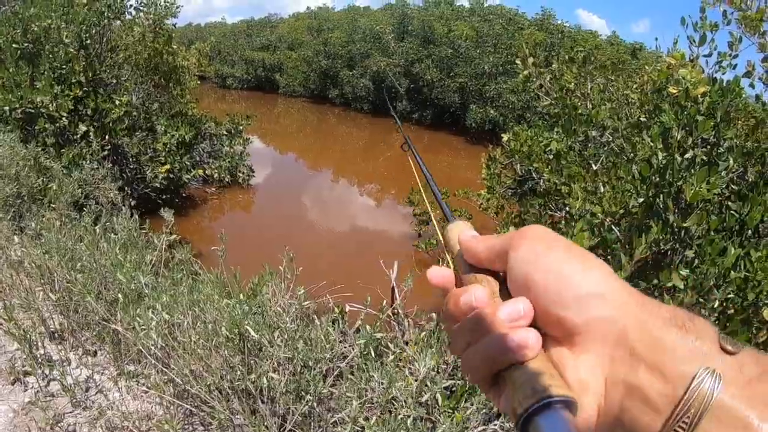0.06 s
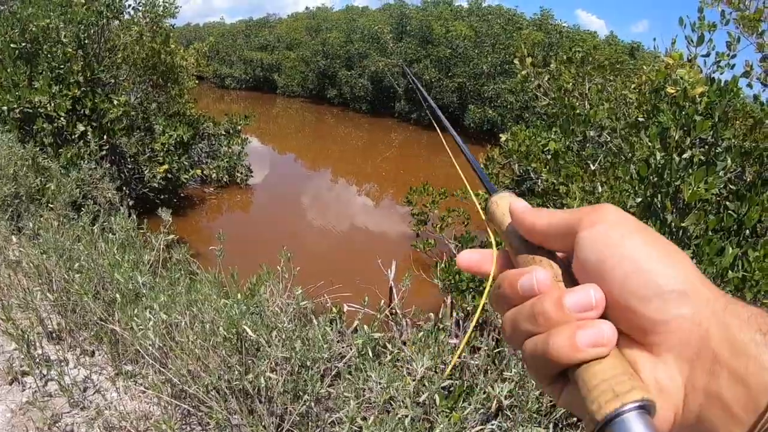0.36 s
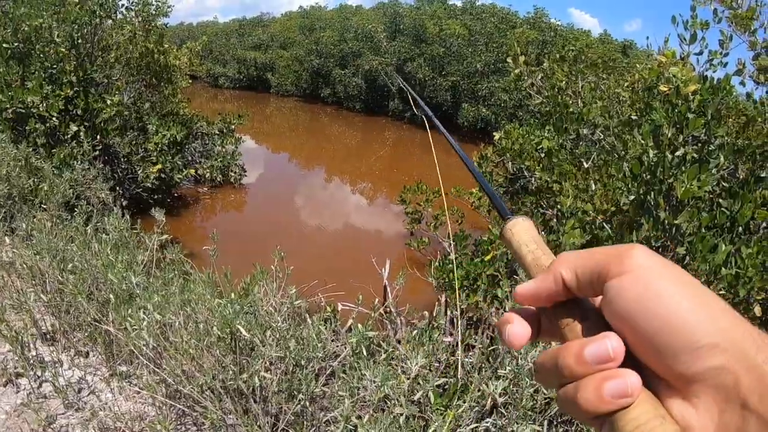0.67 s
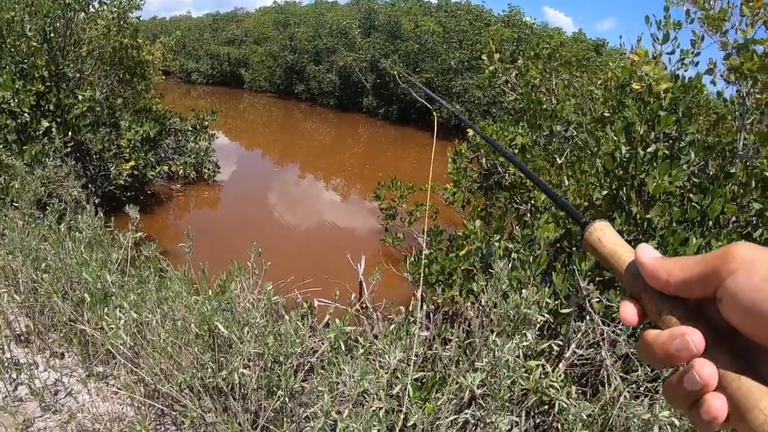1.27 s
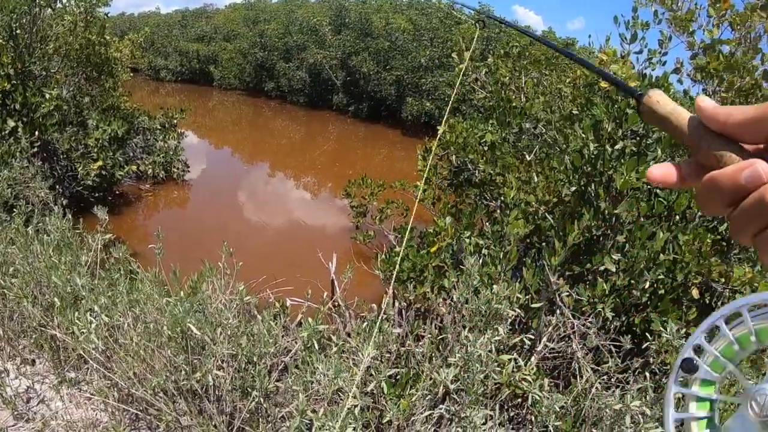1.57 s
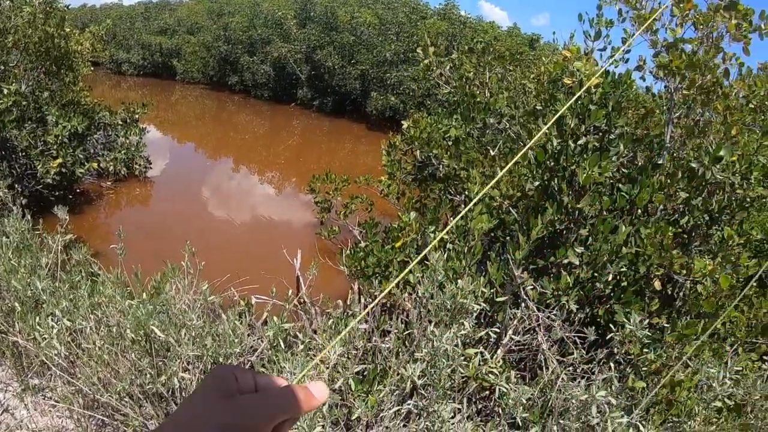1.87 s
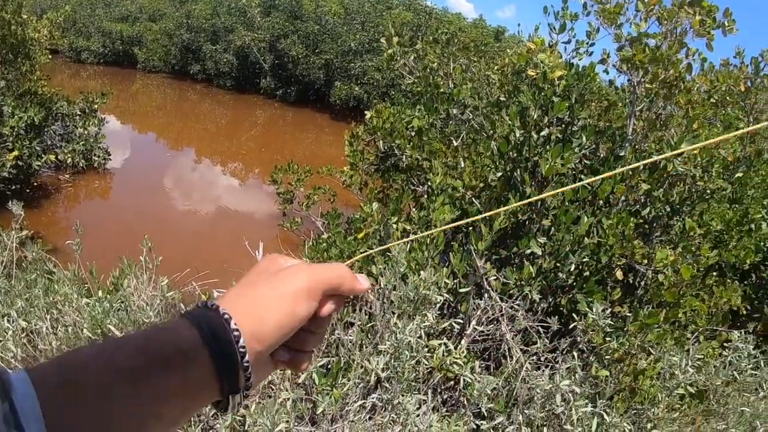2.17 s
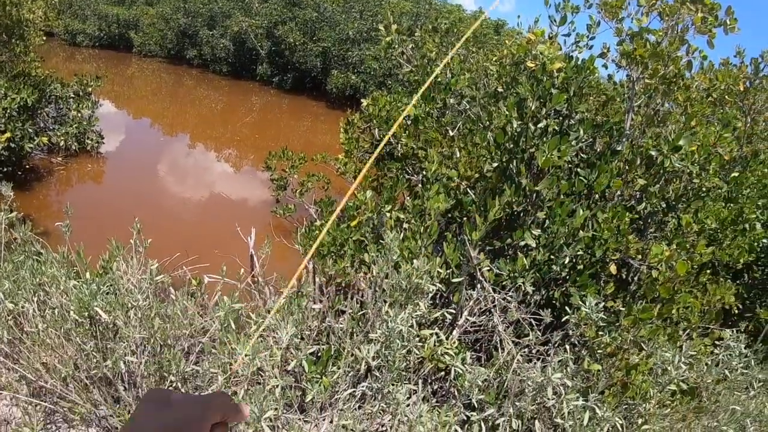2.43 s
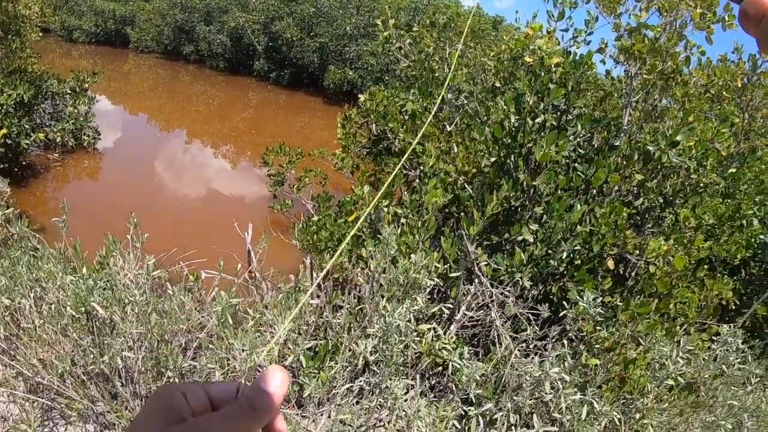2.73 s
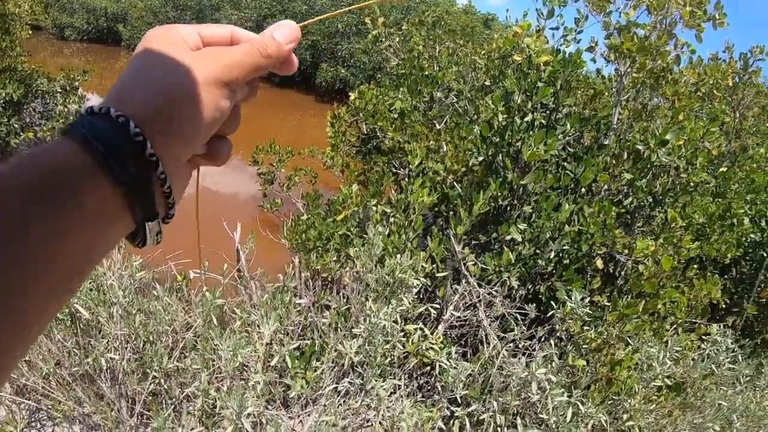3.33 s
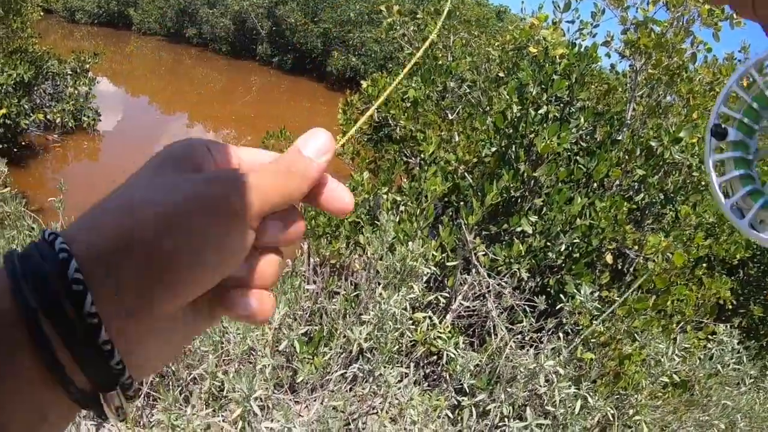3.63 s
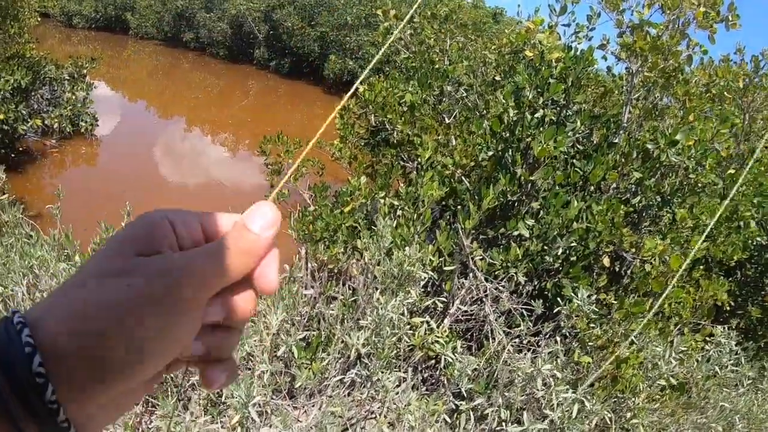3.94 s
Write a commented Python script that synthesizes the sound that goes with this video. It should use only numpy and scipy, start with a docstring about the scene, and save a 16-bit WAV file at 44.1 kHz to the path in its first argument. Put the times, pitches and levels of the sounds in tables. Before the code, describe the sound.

Fishing line pulled four times, hissing and slapping against the rod, after faint grip creaks.

```python
"""An angler on a creek bank handles a fly rod close to a small camera. At first the cork grip creaks
as the hand sticks and slips on it, and the line and fittings tick. From about 1.8 s the line is drawn
through the guides (the rings on the rod) in four pulls: it hisses over fingers and rings, sets the
hollow rod ringing and slaps against it, hardest in the last pull. All the while, light wind buffets
the microphone and a far motor drones in the open air."""
import sys
import numpy as np
from scipy import signal
from scipy.fft import rfft, irfft, next_fast_len
from scipy.io import wavfile
from scipy.ndimage import uniform_filter1d

SR = 44100
rng = np.random.default_rng(int(sys.argv[2]) if len(sys.argv) > 2 else 0)


def materialize(psi):
    """Save the field psi as 16-bit PCM at rate SR to the path in sys.argv[1].

    A 1-D psi becomes a single channel; in a 2-D psi each row is a channel.
    """
    bounded = np.clip(np.atleast_2d(psi).T, -1, 1)
    quanta = np.round(bounded * 32767).astype(np.int16)
    wavfile.write(sys.argv[1], SR, quanta)


N = 176400
CONTACT_GRAINS_PER_S, CONTACT_SPREAD_DB = 22000, 1.5  # the fine crackle in slaps, knocks and ticks


def pulls():
    """Line rubs over guides and fingers: a hiss, the ringing rod and a dull rub, all shaking together."""
    # how loud each pull is, one table per pull (time [s], hiss [dB], ring [dB], rub [dB])
    strokes = [
        [(1.78, -90, -97, -81), (1.916, -66.5, -68, -69.5), (2.028, -64.5, -75.5, -70.5), (2.2, -77, -78, -72)],
        [(2.28, -81, -79, -75), (2.374, -59.5, -66.5, -64.5), (2.52, -56, -60, -65), (2.572, -58, -58, -81),
         (2.644, -66, -62, -67), (2.7, -76, -63, -73), (2.78, -84, -81.5, -78)],
        [(2.86, -110, -82, -96), (2.974, -60, -65, -66), (3.118, -63, -72.5, -69.5), (3.28, -82, -94, -92)],
        [(3.3, -85, -85, -89), (3.422, -61, -71, -71.5), (3.472, -57.5, -66, -65.5), (3.556, -56, -56.5, -69.5),
         (3.632, -57, -60.5, -75), (3.712, -60.5, -60.5, -66.5), (3.862, -65, -64, -94), (4.0, -66.5, -67, -87)],
    ]
    # tone of the hissing line (frequency [Hz], level [dB])
    hiss = [(1500, -56), (2800, -18.5), (5000, -3), (6100, -0.5), (6700, -2.5), (7200, 2), (8500, -1),
            (9600, 0), (10700, -7.5), (11700, -1.5), (13300, -8.5), (14800, -9), (16000, -11.5)]
    # tone of the ringing rod (frequency [Hz], level [dB])
    ring = [(1200, -20), (2200, -12), (2700, -2), (3150, 1.5), (3400, -1.5), (3750, 1.5), (4100, -2),
            (4450, 1.5), (5100, -12), (7000, -15), (12000, -36)]
    # tone of the dull rub (frequency [Hz], level [dB])
    rub = [(250, -16), (600, 4), (900, 4), (1150, 0), (1380, 5), (1650, 0.5), (2200, 1.5), (3500, -16)]
    scratches_per_s, fade_s = 220, 0.055
    t, out = clock(), 0
    sizes = undb(4.5 * np.minimum(rng.exponential(size=N), 3))
    scratches = unit(sizes * (rng.random(N) < scratches_per_s / SR) * rng.choice([-1, 1], (2, N)))
    for column, (tone, gain_db) in enumerate([(hiss, 2.5), (ring, 0.5), (rub, -2)], 1):
        effort = 0
        for pull in map(np.array, strokes):
            outside = t - np.clip(t, pull[0, 0], pull[-1, 0])  # time before or after this pull
            level = undb(gain_db + np.interp(t, pull[:, 0], pull[:, column]))
            effort = effort + level * np.exp(-(outside / fade_s) ** 2)
        friction = grains(9000, spread_db=2) + undb(-8.5) * scratches
        out = out + colour(effort * friction, tone)
    return out * waver(db=0.7, per_s=85)


def patchy(x):
    """Neighbouring bands of pitch swell and fade on their own as the point of contact shifts."""
    size = next_fast_len(N + SR // 10)
    octave = np.log2(np.arange(size // 2 + 1) * SR / size + 1)
    centres = np.linspace(np.log2(500), np.log2(16000), 20)
    spectrum = rfft(x, size)
    bands = (irfft(spectrum * np.interp(octave, centres, pick), size) for pick in np.eye(len(centres)))
    return sum(band[:, :N] * waver(db=2.36, per_s=16) for band in bands)


def zips():
    """The line sings as it runs over a guide: a narrow band of noise that can glide in pitch."""
    # brief notes of the line (time [s], level [dB], half length [s], pitch [Hz], glide [octaves/s])
    notes = [(.409, -55.5, 0.0052, 2687, 0), (1.798, -70.5, 0.021, 8000, 1.5),
             (1.909, -67, 0.046, 3800, 1.3), (2.398, -61, 0.019, 7300, -0.5), (2.451, -61, 0.024, 3010, -2),
             (2.475, -57, 0.022, 9280, -2), (2.5, -59, .012, 13400, 2), (2.608, -58, .035, 3650, -1),
             (2.71, -65.5, .02, 3190, 4), (2.929, -71, 0.043, 3390, 1), (3.027, -66.5, 0.032, 2020, 8),
             (3.11, -50, 0.0022, 9060, -1), (3.386, -66, 0.029, 7900, -.5), (3.526, -66, 0.043, 7140, -0.5),
             (3.81, -61, 0.032, 4340, 1.5), (3.974, -67, 0.028, 6800, 1)]
    width_hz = 560
    t, out = clock(), 0
    noise = rng.standard_normal((2, N)) + 1j * rng.standard_normal((2, N))
    band = signal.sosfilt(signal.butter(2, width_hz / 2, fs=SR, output="sos"), noise)
    for s, db, half, hz, glide in notes:
        pitch = hz * 2 ** (glide * np.clip(t - s, -2 * half, 2 * half))
        note = unit(np.real(band * np.exp(2j * np.pi * np.cumsum(pitch) / SR)))  # band moved up to pitch
        out = out + note * undb(db) * swell(s, half)
    return out


def slaps():
    """The line strikes the rod: a short rattle that sets the rod ringing."""
    # strikes of the line (time [s], level [dB], decay [s])
    strikes = [(2.002, -65, 0.0023), (2.014, -63, 0.0037), (2.071, -64, .003), (2.6409, -42.5, 0.0043),
               (2.662, -47, .003), (2.6736, -44, 0.0028), (3.102, -60, 0.0018), (3.1095, -53.5, 0.0012),
               (3.631, -48.5, .003), (3.6585, -35, 0.0052), (3.6658, -32, 0.0021), (3.675, -59, .004),
               (3.7255, -41, 0.0044), (3.769, -51, 0.0061)]
    # tone of the rattle (frequency [Hz], level [dB])
    tone = [(300, -21), (900, -15.5), (1800, -23), (2300, -1), (2750, 13), (3300, 5.5), (3800, 7),
            (4900, -6), (5700, -1.5), (6600, -9), (7600, -3), (8700, -12), (9550, 5.5), (10700, -15),
            (11500, -2), (13000, -13.5), (16000, -15)]
    force = blows(strikes, attack_s=0.00017, tail_db=-12.5, tail_s=0.016)
    crack = force * grains(CONTACT_GRAINS_PER_S, CONTACT_SPREAD_DB)
    return colour(crack, tone) + undb(-7) * rod(crack)


def rod(push):
    """The hollow rod rings on at its own pitches after a push."""
    # natural notes of the rod (pitch [Hz], level [dB], time to fade by 60 dB [s])
    modes = [(970, -50, 0.13), (2770, 19, 0.045), (2780, -11, .05), (3160, 12.5, .05), (4100, 14, 0.035),
             (4230, 3, 0.055), (8800, -12, 0.022)]
    age = np.arange(SR // 8) / SR
    ring = sum(undb(db - 60 * age / fade) * np.sin(2 * np.pi * hz * age) for hz, db, fade in modes)
    return signal.fftconvolve(push, ring[None] / np.sqrt(np.sum(ring ** 2)))[:, :N]


def knocks():
    """Duller blows of the line on the rod, each sounding hollow around one pitch."""
    # hollow knocks (time [s], level [dB], pitch [Hz])
    hits = [(0.3486, -59.5, 2120), (2.014, -57.5, 2000), (2.221, -61, 1500), (2.248, -55.5, 1110),
            (2.252, -59.5, 620), (3.111, -51.5, 1880), (3.657, -51, 1230), (3.666, -48, 930),
            (3.726, -53.5, 1050)]
    decay_s = 0.0053
    contact, out = grains(CONTACT_GRAINS_PER_S, CONTACT_SPREAD_DB), 0
    for s, db, hz in hits:
        b, a = signal.iirpeak(hz, Q=0.77, fs=SR)
        body = unit(signal.lfilter(b, a, signal.lfilter(b, a, contact)))
        out = out + body * blows([(s, db, decay_s)], attack_s=0.0002, tail_db=-25.5, tail_s=0.024)
    return out


def ticks():
    """Line and fittings touch with bright, dry ticks, and the line slips briefly through the fingers."""
    # sharp touches (time [s], level [dB], decay [s])
    touches = [(.2395, -48, 0.0014), (.5323, -52, .0012), (.546, -59, .002), (.6007, -60, 0.0022),
               (.7765, -46, 0.0016), (.8135, -44, 0.001), (1.018, -44, 0.00065), (1.217, -54, 0.0012),
               (1.322, -63, 0.00092), (1.5411, -61, .002), (1.6182, -42, 0.00072), (1.7030, -52, .0015),
               (1.7585, -57, 0.0023), (1.796, -63, 0.0023), (1.866, -66, 0.0011), (2.003, -47.5, 0.0017),
               (2.071, -52.5, 0.0013), (2.249, -60, 0.006), (3.1095, -46, 0.0016), (3.384, -56, .001)]
    # short slides of the line (time [s], level [dB], half length [s])
    slides = [(0.743, -62.5, .018), (0.794, -67, 0.036), (1.144, -71.5, .07), (1.72, -72, 0.09)]
    # bright tone of both (frequency [Hz], level [dB])
    tone = [(300, -38), (1500, -14.5), (3000, -6.5), (4500, -3), (6000, 0), (9500, 3), (10800, -2.5),
            (12000, 0.5), (16000, -4)]
    force = blows(touches, attack_s=0.000067, tail_db=-22.5, tail_s=0.016)
    contact = force * grains(CONTACT_GRAINS_PER_S, CONTACT_SPREAD_DB)
    sliding = sum(undb(db) * swell(s, half) for s, db, half in slides)
    return colour(contact + sliding * grains(3000, spread_db=7.0), tone)


def creaks():
    """The hand shifts on the cork grip in little runs of sticking and slipping."""
    # shifts of the hand (time [s], level [dB], decay [s])
    shifts = [(.012, -66.5, 0.015), (.125, -69, 0.013), (.143, -62, 0.0072), (.163, -63.5, 0.022),
              (.3463, -50.5, 0.0035), (.37, -65, 0.033), (.398, -69, .005), (.4045, -53, 0.0094),
              (.585, -65, 0.011), (.603, -62.5, 0.009), (.7464, -59.5, 0.007), (.777, -55, 0.0066),
              (.853, -65, 0.0091), (.9654, -62, 0.012), (1.0671, -60.5, 0.012), (1.085, -61.5, 0.005),
              (1.1375, -55.5, 0.0097), (1.1624, -58.5, 0.021), (1.1839, -56, 0.0044), (1.222, -63, 0.014),
              (1.2752, -65.5, 0.011), (1.2871, -60.5, 0.0086), (1.3126, -62.5, 0.0055),
              (1.3625, -63.5, .004), (1.4443, -65, 0.021), (1.61, -58.5, 0.0025), (1.636, -65, 0.0031),
              (1.679, -66, .005), (2.81, -64, 0.014), (3.86, -53, 0.0038)]
    # tone of the grip (frequency [Hz], level [dB])
    tone = [(400, -3.5), (1500, -9.5), (2200, -13), (2620, 4), (3100, 4), (3600, -5.5), (4200, -0.5),
            (5300, -11), (7000, -11), (8300, -6), (9500, -5.5), (10700, -20), (12000, -11), (16000, -17)]
    force = blows(shifts, attack_s=0.00063, tail_db=-39.5, tail_s=0.042)
    return colour(force * grains(3100, spread_db=7.5), tone)


def wind():
    """Gusts rumble on the two microphone openings, more on the right one."""
    # strength of the wind (time [s], level [dB])
    gusts = [(0, -52), (.2, -50), (.35, -52), (.6, -52), (.92, -56.5), (1.5, -57), (1.88, -57), (2.03, -49),
             (2.2, -53), (2.32, -61), (2.5, -53.5), (3.2, -58.5), (4, -57)]
    # tone of the rumble (frequency [Hz], level [dB])
    tone = [(10, -3.5), (25, 3.5), (45, 2.5), (70, 0.5), (120, -18), (250, -28), (600, -67.5)]
    strength = undb(np.interp(clock(), *np.array(gusts).T))
    mid, side = colour(rng.standard_normal((2, N)), tone) * strength
    return (mid + undb(-5.5) * side * np.array([[1], [-1]])) * pan(-3)


def puffs():
    """Each small swirl of wind gives one soft push and pull of pressure, almost only on the right."""
    # swirls hitting the microphone (time [s], level [dB], width [s])
    swirls = [(0.018, -36, 0.0021), (0.0539, -26.5, 0.0015), (0.152, -34, .004), (0.206, -29.5, 0.0048),
              (.551, -36.5, 0.0043), (.791, -38, 0.0071), (2.03, -37, 0.0072)]
    left_db, pressure = -26.5, 0
    for s, db, width in swirls:
        x = (clock() - s) / width
        pressure = pressure - 2 * undb(db) * x / (1 + x ** 2) * np.exp(-(x / 5) ** 2)
    return pressure * np.array([[undb(left_db)], [1]])


def motor():
    """A far motor fires in even pulses: a low note and overtones, each fading a little on its way."""
    # overtones of the drone (multiple of the firing rate, level [dB])
    harmonics = [(2, 0), (3, -11.5), (4, -17.5), (5, -16.5), (6, -27.5), (7, -31)]
    # rise and fall of the drone (time [s], low note [dB], overtones [dB])
    loudness = [(0.1, -49.5, -57.5), (0.22, -50, -60.5), (0.74, -65.5, -55.5), (1.04, -50.5, -55.5),
                (1.1, -51.5, -51.5), (1.88, -57.5, -58.5), (2.22, -56.5, -57.5), (2.26, -64.5, -62.5),
                (2.49, -53, -60), (2.76, -55, -58.5), (2.93, -49.5, -57), (4.0, -53.5, -60.5)]
    firing_hz, drift = 81.8, 0.0031
    t = clock()
    s, low_db, high_db = np.array(loudness).T
    phase = 2 * np.pi * np.cumsum(firing_hz * (1 + drift * walk(6))) / SR
    tone = lambda k: np.sqrt(2) * np.cos(k * phase) * waver(db=1, per_s=8.3)
    overtones = sum(undb(db) * tone(k) for k, db in harmonics) * undb(np.interp(t, s, high_db) - 1.5)
    low_note = tone(1) * undb(np.interp(t, s, low_db) - 0.5)
    return (low_note + overtones) * waver(db=0.5, per_s=25)


def air():
    """Distant rumble and faint hiss of the open bank."""
    # tone of the open air (frequency [Hz], level [dB])
    tone = [(30, 2), (110, 2), (190, -0.5), (280, -8.5), (400, -12), (550, -18), (900, -19.5),
            (1400, -27.5), (2300, -30.5), (6000, -34.5), (9400, -34.5), (10700, -40.5), (13500, -41),
            (16000, -53)]
    # how wide the air sounds (frequency [Hz], side minus middle [dB])
    width = [(60, -14), (300, -13.5), (1000, -5.5), (3000, -0.5), (9000, 8)]
    noise = colour(rng.standard_normal((2, N)), tone)
    return spread(noise, width) * undb(-59) * waver(db=0.65, per_s=3.19)


def grains(per_s, spread_db):
    """Two streams of tiny stick-and-slip clicks of uneven size, with a steady average force."""
    size = undb(spread_db * rng.exponential(size=N)) * (rng.random(N) < per_s / SR)
    force = np.sqrt(np.abs(uniform_filter1d(size ** 2, int(0.003 * SR))) + 1e-6)  # over 3 ms
    return unit(size / force * rng.choice([-1, 1], (2, N)))


def blows(rows, attack_s, tail_db, tail_s):
    """Loudness of hits (time [s], level [dB], decay [s]): a quick rise, a fall and a faint tail."""
    power = np.zeros(N)
    age = np.arange(SR // 6) / SR
    rise = np.minimum(age / attack_s, 1)
    tail = undb(tail_db) * np.exp(-age / tail_s)
    for start, db, decay in rows:
        fall = np.exp(-np.maximum(age - attack_s, 0) / decay)
        shape = undb(db) * rise * (fall + tail)
        i = int(start * SR)
        power[i:i + len(age)] += shape[:N - i] ** 2
    return np.sqrt(power)


def swell(peak_s, half_s):
    """A smooth, bell-shaped rise and fall."""
    return np.exp(-((clock() - peak_s) / half_s) ** 2 / 2)


def walk(per_s):
    """A smooth random curve of size about 1, through per_s random points a second."""
    knots = rng.standard_normal(1024)
    smooth = signal.resample_poly(knots, 8, 1)
    return unit(np.interp(clock() * per_s, np.arange(len(smooth)) / 8, smooth))


def waver(db, per_s):
    """A gain that wanders up and down by about db decibels."""
    return undb(db * walk(per_s))


def colour(x, points):
    """Give a sound the listed tone; white noise keeps its power."""
    cepstrum = irfft(np.log(unit(response(points))))
    cepstrum[1:N] *= 2  # folded so the filter rings only after a click, never before
    cepstrum[N + 1:] = 0
    return irfft(rfft(x, 2 * N) * np.exp(rfft(cepstrum)))[..., :N]


def spread(pair, width):
    """Two unrelated signals become left and right, with a width for each frequency."""
    mid, side = rfft(pair, 2 * N)
    side = side * response(width)
    return irfft(np.array([mid + side, mid - side]))[:, :N]


def response(points):
    """Gain at every frequency from points (frequency [Hz], level [dB])."""
    hz, db = np.array(points, float).T
    return undb(np.interp(np.log(np.arange(N + 1) * SR / (2 * N) + 1), np.log(hz), db))


def pan(db):
    """Left and right gains, with the left db decibels above the right."""
    return undb(np.array([[db], [-db]]) / 2)


def undb(db):
    """Decibels to gain."""
    return 10 ** (np.asarray(db) / 20)


def unit(x):
    """Scale to an average power of 1."""
    return x / np.sqrt(np.mean(x ** 2))


def clock():
    """Time of every sample in seconds."""
    return np.arange(N) / SR


def scene():
    """Rod and line close by, over motor, wind and air."""
    # how wide the close sounds are (frequency [Hz], side minus middle [dB])
    width = [(500, -12), (3000, -11), (5000, -6), (8000, 0), (12000, -8)]
    sources = [(patchy(pulls()) + zips(), 0.3), (slaps() + knocks(), 1.5),
               (ticks(), -3.5), (creaks(), -0.5)]
    near = sum(spread(sound, width) * pan(left_db) for sound, left_db in sources)
    return near + motor() + wind() + puffs() + air()


def record(dry):
    """Each microphone opening has its own tone, the left hears slightly later, and top treble is cut."""
    # balance of the two openings (frequency [Hz], left minus right [dB])
    balance = [(200, 0), (2500, -0.5), (4000, -0.3), (7300, -2.5), (8700, -3), (9300, 2), (9900, 15.5),
               (10700, -17.5), (11600, 11), (12600, 4), (15000, -0.5)]
    left_lag_s, top_hz = 0.00002, 15900
    hz = np.arange(N + 1) * SR / (2 * N)
    gain = np.sqrt(response(balance))
    openings = np.array([gain * np.exp(-2j * np.pi * hz * left_lag_s), 1 / gain])
    heard = irfft(rfft(dry, 2 * N) * openings)[:, :N]
    return signal.sosfilt(signal.ellip(10, .1, 80, top_hz, fs=SR, output="sos"), heard)


dry = scene()
out = record(dry)
materialize(out)
```